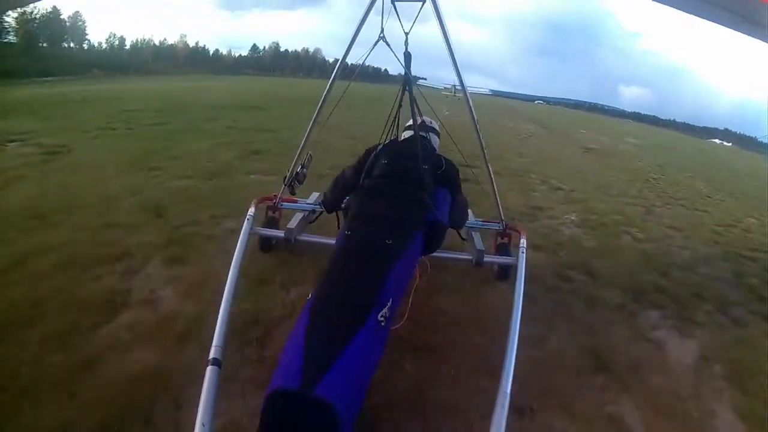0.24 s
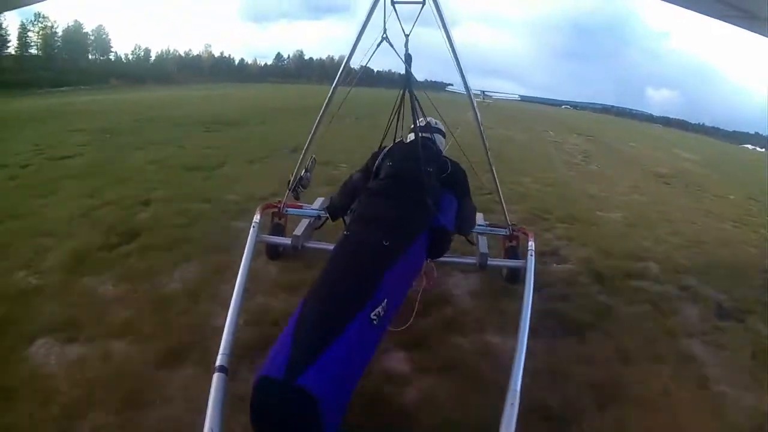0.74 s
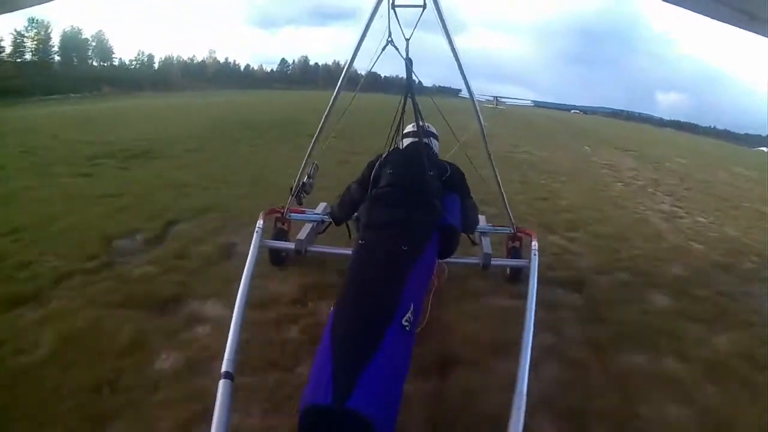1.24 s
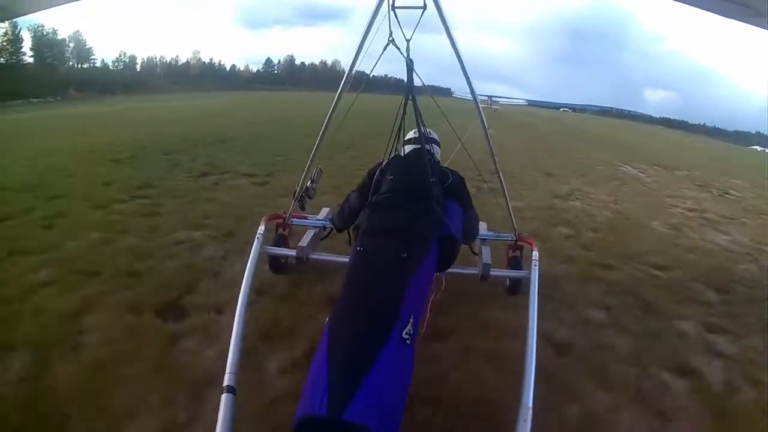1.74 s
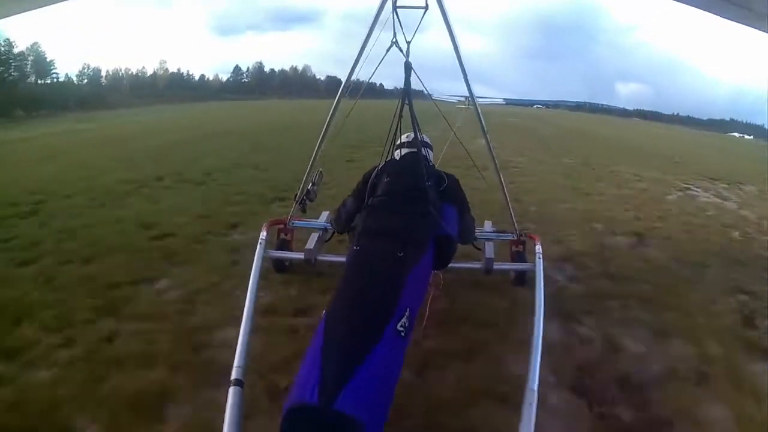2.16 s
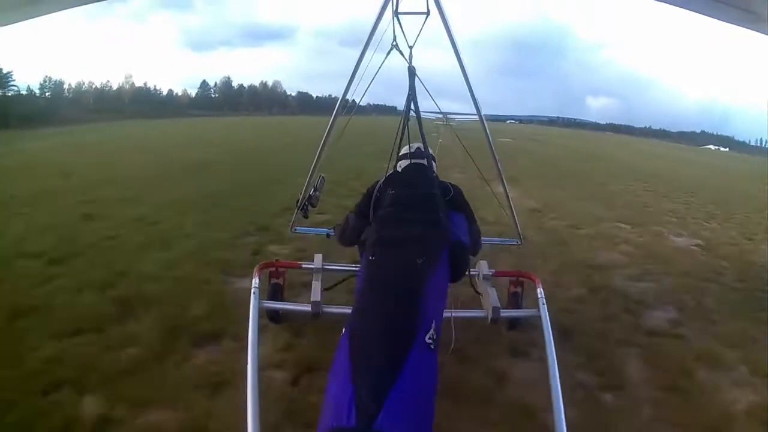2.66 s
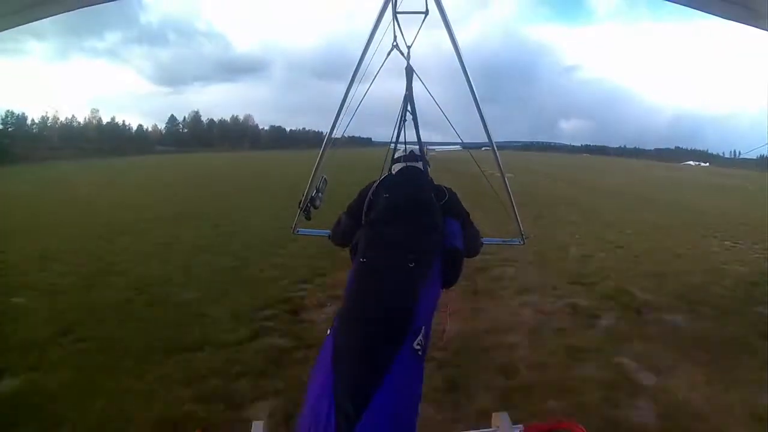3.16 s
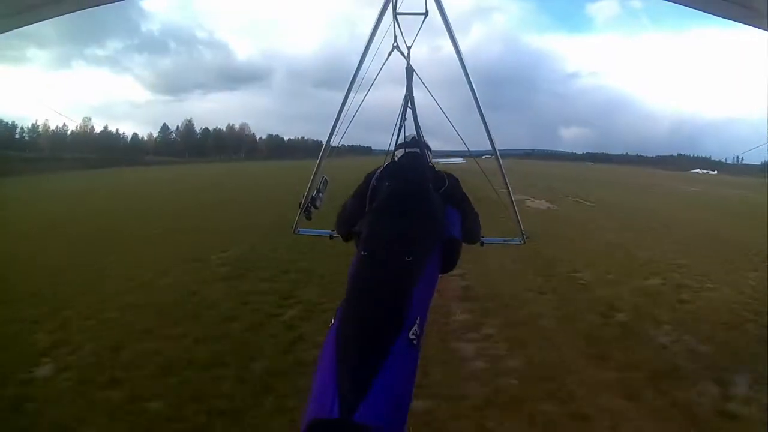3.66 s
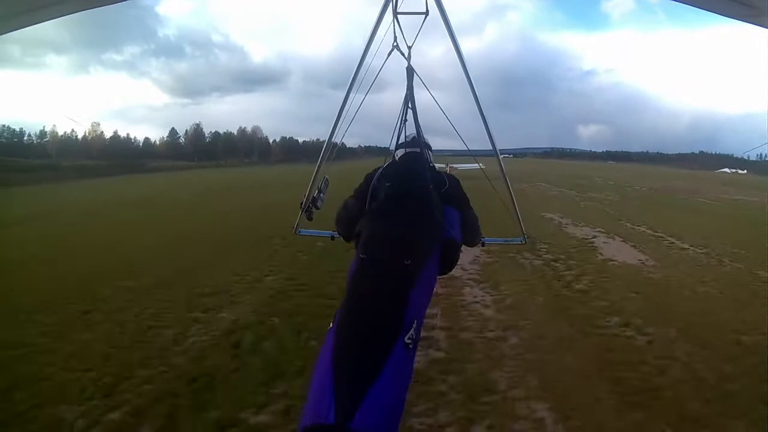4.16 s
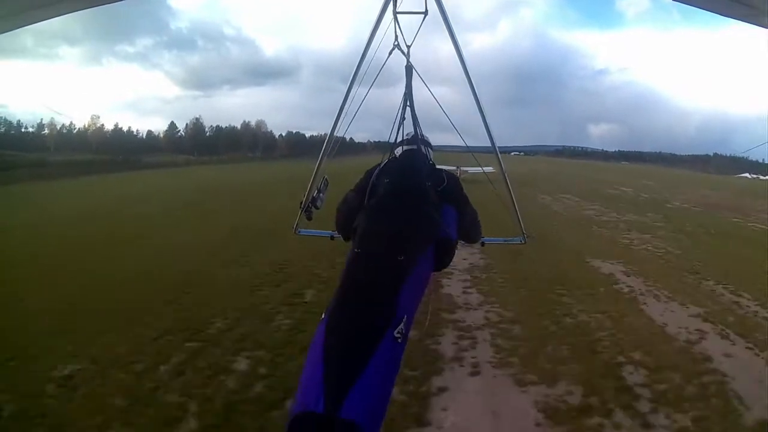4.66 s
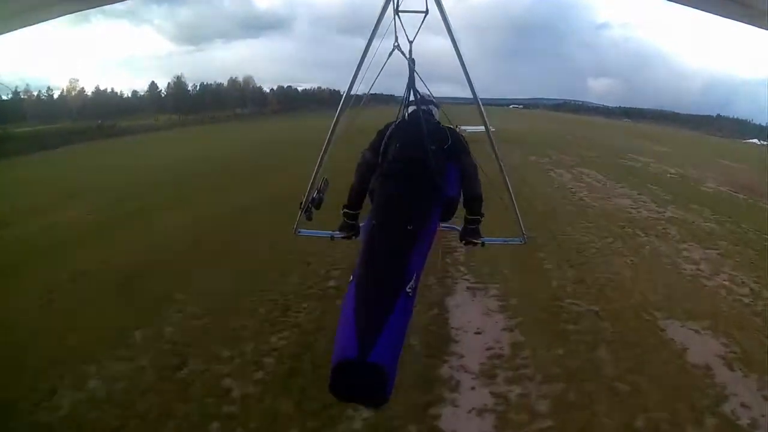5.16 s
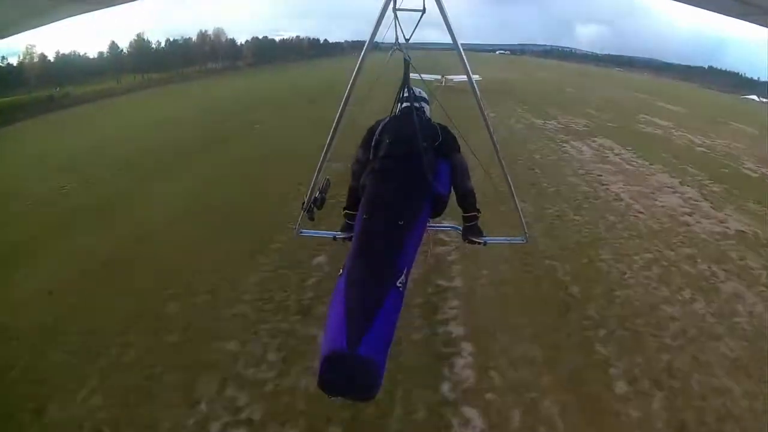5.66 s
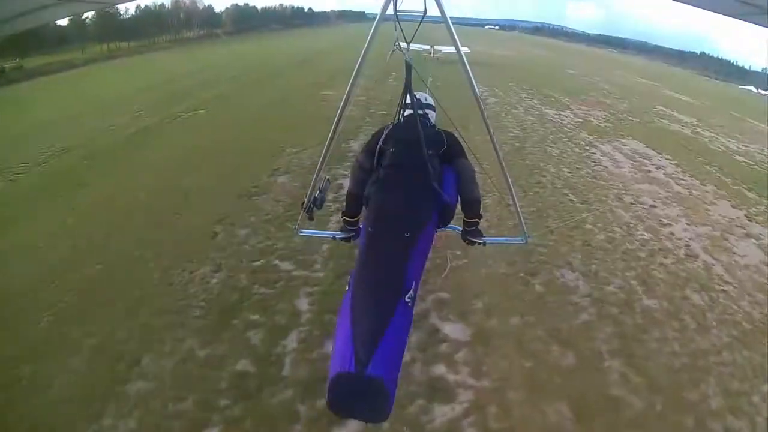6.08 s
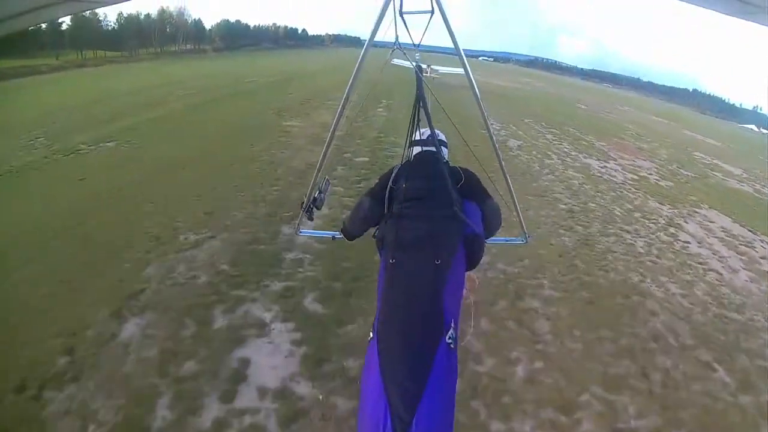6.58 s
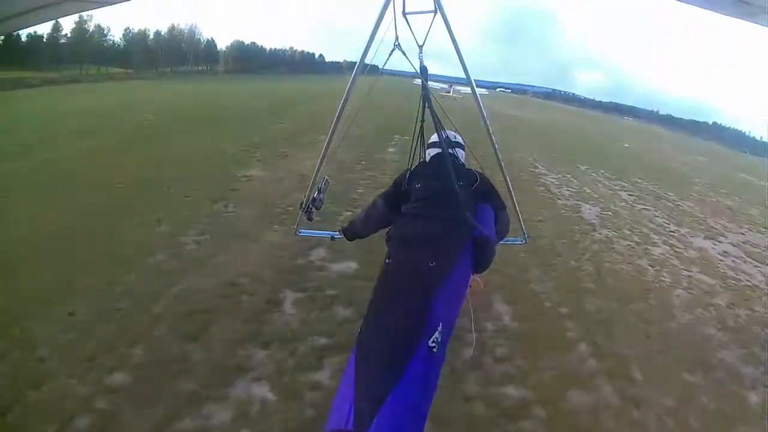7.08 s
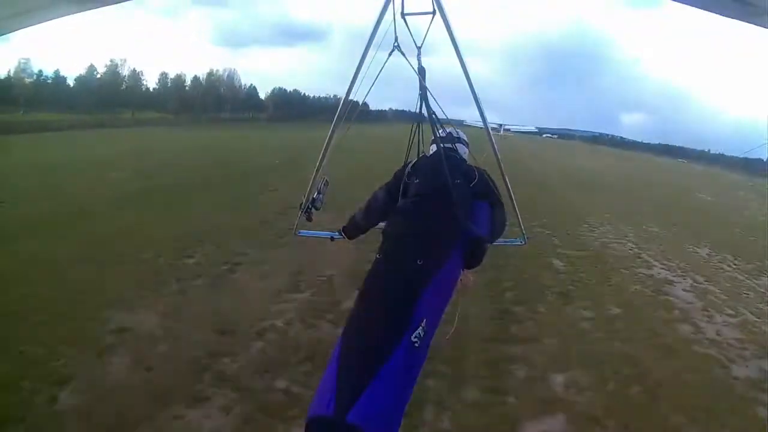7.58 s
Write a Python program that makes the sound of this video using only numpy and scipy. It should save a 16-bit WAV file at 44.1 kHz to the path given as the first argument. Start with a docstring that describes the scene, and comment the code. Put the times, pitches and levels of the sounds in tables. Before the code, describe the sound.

Left channel only, close and boxy: loose metal fittings chatter, wheels jolt over tussocks and a hollow tube sings with short, unsteady rings. The clatter is crowded and slightly distorted in the first half. After lift-off it breaks into separate small clanks and fading ticks over a muffled open-air rush, with one soft thump near five seconds, then mostly wind that dips and swells again.

```python
"""Clattering and ringing metal gives way to a rush of air with ever sparser clanks, all in the left channel.
A hang glider on a wheeled trolley is towed over rough grass, heard by a cased camera on its keel tube.
Frame and tube are banks of damped resonators driven by random contacts; fittings strike as decaying sines.
Saturation limits all the shaking; the airflow is filtered noise that bypasses it."""
import sys
import numpy as np
from scipy import signal
from scipy.fft import rfft, irfft
from scipy.io import wavfile
from scipy.ndimage import uniform_filter1d

SR = 44100
rng = np.random.default_rng(int(sys.argv[2]) if len(sys.argv) > 2 else 0)


def persist_wave(psi):
    """Save psi, clipped to +-1, as 16-bit WAV."""
    counts = np.round(np.clip(psi, -1, 1) * 32767).astype(np.int16)
    wavfile.write(sys.argv[1], SR, np.atleast_2d(counts).T)


N = 344862
TIME = np.arange(N) / SR
LIFT_OFF_S = 3.78


def from_db(db):
    """Logarithmic level: decibels to amplitude gain."""
    return 10 ** (np.asarray(db) / 20)


def rms_one(x):
    """Normalisation: scale to unit rms."""
    return x / np.sqrt(np.mean(x ** 2) + 1e-20)


def in_time(rows):
    """Linear interpolation: one curve per column, at every sample."""
    s, *columns = np.transpose(rows)
    return [np.interp(TIME, s, c) for c in columns]


def drift(rate_hz):
    """Low-passed noise: a slow random curve of spread 1, made at every 40th sample."""
    step, settle = 40, 2000   # samples; slow samples discarded
    pole = np.exp(-2 * np.pi * step * rate_hz / SR)
    noise = rng.standard_normal(N // step + settle + 2)
    slow = signal.lfilter([1], [1, -2 * pole, pole * pole], noise)[settle:]
    return np.interp(np.arange(N) / step, np.arange(len(slow)), rms_one(slow))


def colour(x, spectrum, size=4096):
    """Minimum-phase filtering: the folded cepstrum gives a causal response through a spectrum table."""
    hz, db = np.transpose(spectrum)
    grid = np.maximum(np.arange(size // 2 + 1) * SR / size, 1)
    cepstrum = irfft(np.log(from_db(np.interp(np.log(grid), np.log(hz), db))))
    cepstrum[1:size // 2] *= 2
    cepstrum[size // 2 + 1:] = 0
    response = irfft(np.exp(rfft(cepstrum)))
    return signal.fftconvolve(x, response)[:N]


def ring(force, hz, t60):
    """Damped resonance: a unit click starts a sine of height 1 that falls 60 dB in t60 seconds."""
    r = from_db(-60 / (t60 * SR))
    w = 2 * np.pi * hz / SR
    return signal.lfilter([0, np.sin(w)], [1, -2 * r * np.cos(w), r * r], force + 1e-18)


def contacts(per_s, spread_db):
    """Random point process: touches of uneven strength and either sign."""
    sizes = from_db(spread_db * np.minimum(rng.exponential(1, N), 4)) * rng.choice([-1, 1], N)
    return sizes * (rng.random(N) < per_s / SR)


def evened(x, size=2400):
    """Level control: hold the running rms near 1, keeping the fast grain."""
    power = np.maximum(uniform_filter1d(x ** 2, size), 0)
    return x / np.sqrt(power + 1e-4 * np.mean(x ** 2))


def blow(rise_s, t60):
    """Impact envelope: time axis and a smooth rise with exponential decay, peak 1."""
    t = TIME[:SR // 2]
    shape = (1 - np.exp(-(t / rise_s) ** 2)) * from_db(-60 * t / t60)
    return t, shape / shape.max()


def held(attack_s, hold_s, t60):
    """Sustained envelope: time axis and a linear rise, a hold and an exponential decay."""
    t = TIME[:SR // 2]
    return t, np.minimum(t / attack_s, 1) * from_db(-60 * np.maximum(t - hold_s, 0) / t60)


def add(out, s, sound):
    """Superposition: mix a sound in at time s."""
    at = max(round(s * SR), 0)
    out[at:at + len(sound)] += sound[:N - at]


def chatter(per_s, depth_db, t60):
    """Bouncing contact: a gain of sudden knocks at uneven gaps, each dying fast; running rms near 1."""
    strikes = np.abs(contacts(per_s, spread_db=2.0))
    knocks = signal.lfilter([1], [1, -from_db(-60 / (t60 * SR))], strikes + 1e-18)
    return evened(np.hypot(1, from_db(depth_db) * rms_one(knocks)), size=4400)


def pings(per_s, hz, scatter_hz, t60, spread_db):
    """Scattered impacts: random short strikes, each with its own pitch and strength; rms 1."""
    out = np.zeros(N)
    t, shape = blow(rise_s=.003, t60=t60)
    t, shape = t[:SR // 10], shape[:SR // 10]
    gaps = rng.uniform(.3, 1.7, 1000)   # relative to the mean gap
    draws = rng.standard_normal((1000, 2))
    for s, (pitch, size) in zip(np.cumsum(gaps) / per_s, draws):
        if s < TIME[-1]:
            tone = np.sin(2 * np.pi * (hz + scatter_hz * pitch) * t)
            add(out, s, from_db(spread_db * min(size, 2)) * shape * tone)
    return rms_one(out)


# Modes of the glider's frame. Each row: frequency in Hz, relative level in dB, t60 in seconds.
FRAME_MODES = [(93.6, -11, 1), (178.7, -11.5, 0.41), (265, -17, 0.25), (417, -12, 0.13), (505, 1, 0.25),
               (680.5, -2.5, 0.25), (768.4, -10, 0.12), (865, -1, 0.29), (941, -4, 0.017),
               (1054, -1, 0.044)]


def stirred_frame(force):
    """Modal superposition: the frame's modes under a steady random force, each weighted by its level."""
    return sum(from_db(db) * rms_one(ring(force, hz, t60)) for hz, db, t60 in FRAME_MODES)


# Course of the airflow. Each row: time in seconds, relative level in dB.
WIND_LEVEL = [(3.7, -45), (4.0, -38.5), (4.35, -38), (4.9, -42), (5.3, -46.5), (6.2, -46), (6.55, -42.5),
              (7.27, -41), (7.82, -37)]
# Rush of air as it sounds inside the case. Each row: frequency in Hz, relative level in dB.
AIR_SPECTRUM = [(40, -38.5), (170, -28), (320, -23), (460, -11), (620, -9.5), (800, -3.5), (875, -1),
                (970, -3.5), (1330, 3.5), (1570, -2.5), (1780, -14.5), (2100, -14.5), (2550, -22),
                (3100, -36), (3520, -34.5), (4400, -48.5), (5000, -62.5), (14000, -87.5)]


def airflow(start_db=-31.0, flutter_db=1.1, grain_db=1.0, hum_db=-16):
    """Turbulence noise: a fluttering rush grows up to lift-off and stirs the frame's modes."""
    ground_db = np.interp(TIME, [0, LIFT_OFF_S], [start_db, 0])
    eddies = rng.standard_normal(N) * from_db(flutter_db * drift(6.5) + grain_db * drift(200))
    rush = rms_one(colour(eddies, AIR_SPECTRUM))
    hum = stirred_frame(rng.standard_normal(N))
    hum = signal.sosfilt(signal.butter(2, [170, 800], "band", fs=SR, output="sos"), hum)
    level = from_db(ground_db + in_time(WIND_LEVEL)[0])
    return level * (rush + from_db(hum_db) * rms_one(hum))


# A wheel hits a tussock. Each row: start in seconds, level in dB, nominal pitch of the knock in Hz.
WHEEL_JOLTS = [(.292, -21.5, 725), (0.538, -19, 878), (0.582, -13.5, 933), (0.794, -17.5, 926),
               (0.933, -13.5, 942), (1.002, -15.5, 930), (1.024, -16, 939), (1.126, -11, 883),
               (1.243, -15.5, 950), (1.35, -13, 913), (1.402, -22.5, 958), (1.454, -11.5, 929),
               (1.73, -15.5, 690), (1.868, -23.5, 868), (2.322, -22, 830), (2.399, -14, 854),
               (2.67, -18.5, 870), (2.786, -17, 851), (3.46, -23, 721), (3.544, -19, 873)]
# Short, dead knocks on the frame. Each row: start in seconds, level in dB, nominal pitch in Hz.
FRAME_KNOCKS = [(2.035, -18, 1380), (2.09, -18, 920), (2.478, -10, 1150), (2.526, -20, 1000),
                (3.285, -16, 1270), (3.486, -19, 1050), (5.293, -32, 697), (5.78, -30, 660)]
# Dead knock of a wheel or a fitting. Each row: frequency in Hz, relative level in dB.
KNOCK_SPECTRUM = [(55, -16), (170, 6), (500, 3.5), (900, -5), (1300, -0.5), (2000, -8), (3000, -16.5),
                  (6000, -35.5), (14000, -46)]
JOLT_RISE_S, JOLT_T60_S, KNOCK_T60_S = 0.0024, 0.11, 0.064


def frame(rumble, jolt_db=-2.5, knock_db=3.0, rough_db=-8, waver=0.049, patter_db=-6):
    """Forced modal vibration: tussocks shake and patter on the frame, with separate pitched jolts."""
    jolts, tones = np.zeros((2, N))
    bend = np.cumsum(1 + waver * drift(120)) / SR   # the contact stiffens and slackens within a jolt
    for rows, t60, shake_db in (WHEEL_JOLTS, JOLT_T60_S, jolt_db), (FRAME_KNOCKS, KNOCK_T60_S, rough_db):
        t, shape = blow(JOLT_RISE_S, t60)
        for s, db, hz in rows:
            add(jolts, s, from_db(db + shake_db) * shape)
            clock = bend[round(s * SR):][:len(t)]
            add(tones, s, from_db(db) * shape[:len(clock)] * np.sin(2 * np.pi * hz * clock))
    force = contacts(per_s=1500, spread_db=3.0) * chatter(per_s=33, depth_db=10.5, t60=0.051)
    modes = np.zeros(N)
    for k, (hz, db, t60) in enumerate(FRAME_MODES):
        modes += (-1) ** k * from_db(db) * rms_one(ring(force, hz, t60))   # alternate polarity
    knocking = rms_one(colour(force, KNOCK_SPECTRUM))
    shake = evened(rms_one(modes) + from_db(knock_db) * knocking, size=1500)
    patter = pings(per_s=40, hz=950, scatter_hz=220, t60=.035, spread_db=4)
    return tones + shake * np.hypot(jolts, rumble) + from_db(patter_db) * patter * rumble


# Loose fittings thrown into a bout of rattling. Each row: start in seconds, hold in seconds, level in dB.
RATTLE_BOUTS = [(0.566, 0.031, -14.5), (0.618, 0.017, -10), (0.789, .02, -18.5), (0.81, 0.058, -20),
                (0.919, 0.13, -16.5), (1.082, 0.083, -15.5), (1.183, 0.037, -19.5), (1.241, 0.033, -17.5),
                (1.299, 0.024, -17.5), (1.335, 0.037, -17), (1.4, 0.019, -15.5), (1.46, 0.062, -13),
                (1.527, 0.076, -21), (1.705, 0.02, -14), (1.762, 0.017, -18), (1.936, 0.022, -11.5),
                (1.978, 0.15, -18), (2.137, 0.065, -16.5), (2.255, 0.042, -17.5), (2.398, 0.032, -16.5),
                (2.507, 0.076, -20), (2.673, 0.062, -23), (2.752, 0.049, -21.5), (2.943, 0.017, -16),
                (2.986, 0.021, -22), (3.043, 0.039, -22.5), (3.331, 0.025, -18.5), (3.386, .11, -20),
                (3.59, 0.026, -28)]
RATTLE_ATTACK_S, RATTLE_T60_S = 0.011, 0.075


def bouts():
    """Envelope superposition: the strength of the rattling, bout by bout."""
    gain = np.zeros(N)
    for s, hold_s, db in RATTLE_BOUTS:
        add(gain, s, from_db(db) * held(RATTLE_ATTACK_S, hold_s, RATTLE_T60_S)[1])
    return gain


# Ringing modes of the keel tube. Each row: frequency in Hz, relative level in dB, t60 in seconds.
TUBE_MODES = [(1592, 0, .3), (1621, -1, .3), (1680, -2, .15), (2260, -9, .09), (4540, -14, .1),
              (5505, -20, .2)]
# Clatter of metal. Each row: frequency in Hz, relative level in dB.
CLATTER_SPECTRUM = [(30, -27), (200, -1.5), (700, 1), (1200, -2), (1520, 6.5), (1900, -1), (2300, -2.5),
                    (3200, -18), (6000, -10), (14000, -33)]
CLACK_HZ = 1539.5


def fittings(rumble, tube_db=-1.0, spill_db=-13.0, loose_db=-24.5, loose_power=1.36, clack_db=-3, grit_db=-2):
    """Repeated impact excitation: loose metal chatters with the shaking and stirs the tube's modes."""
    loose = from_db(loose_db) * (rumble / rumble.max()) ** loose_power
    rattling = np.hypot(bouts(), loose)
    bounce = chatter(per_s=50, depth_db=10.0, t60=.035)
    force = contacts(per_s=200, spread_db=3.0) * bounce
    tube = evened(sum(from_db(db) * ring(force, hz, t60) for hz, db, t60 in TUBE_MODES), size=1500)
    scratches = contacts(per_s=2200, spread_db=0.0) * bounce
    grit = evened(colour(scratches, CLATTER_SPECTRUM), size=1500)
    clacks = pings(per_s=70, hz=CLACK_HZ, scatter_hz=45, t60=.025, spread_db=3)
    tube_level = np.hypot(from_db(spill_db) * rattling, from_db(tube_db) * rumble)
    return tube_level * tube + rattling * (from_db(grit_db) * grit + from_db(clack_db) * clacks)


# Response of the camera to shaking. Each row: frequency in Hz, relative level in dB.
CASE_RESPONSE = [(30, -18), (500, -6), (920, 1.5), (1250, -3.5), (1650, -6.5), (2600, -7.5), (3100, -15),
                 (4650, -31), (5000, -48.5), (5700, -40.5), (7000, -50.5), (8300, -35.5), (11500, -32),
                 (14000, -54.5)]
OVERLOAD_DB, KNEE = -17.5, 40   # limit before the case filter; a larger knee exponent bends more sharply


def camera(shaking):
    """Amplitude saturation: shaking overloads the microphone, adding a thin buzz; the case then dulls it."""
    drive = np.abs(shaking) / from_db(OVERLOAD_DB)
    return colour(shaking / (1 + drive ** KNEE) ** (1 / KNEE), CASE_RESPONSE)


# The keel tube sings on in one of its modes.
# Each row: start in seconds, hold in seconds, level in dB, nominal pitch in Hz.
TUBE_RINGS = [(0.147, 0.012, -29, 1646), (0.269, 0.007, -19, 1700), (0.306, 0.14, -29, 1619),
              (0.418, 0.038, -17.5, 1600), (0.714, 0.012, -20.5, 1627), (.933, 0.018, -19.5, 1524),
              (0.964, 0.023, -13, 1675), (1.204, 0.024, -24.5, 1630), (1.301, 0.017, -36, 1630),
              (1.467, 0.09, -26.5, 1594), (1.552, 0.11, -22, 1642), (2.105, 0.019, -16.5, 1677),
              (2.157, 0.12, -20, 1618), (2.547, 0.034, -20, 1673), (2.741, 0.008, -21.5, 1579),
              (2.927, 0.19, -21.5, 1597), (3.219, 0.017, -30.5, 1700), (3.34, 0.0097, -11.5, 1600),
              (3.4, 0.046, -15, 1590), (3.612, 0.023, -27.5, 1580), (3.796, 0.067, -25, 1577),
              (4.955, 0.021, -26, 1574), (6.172, 0.017, -23, 1595)]
RING_ATTACK_S, RING_T60_S = 0.0067, 0.29


def singing(waver=0.0026, flicker_db=4.0, partner_hz=72, partner_db=-11):
    """Beating of close modes: one unsteady tube mode rings on against a weaker one just above it."""
    out = np.zeros(N)
    clock = np.cumsum(1 + waver * drift(14)) / SR
    for s, hold_s, db, hz in TUBE_RINGS:
        t, shape = held(RING_ATTACK_S, hold_s, RING_T60_S)
        at = round(s * SR)
        turn = 2 * np.pi * (clock[at:][:len(t)] - clock[at])
        tone = np.sin(hz * turn) + from_db(partner_db) * np.sin((hz + partner_hz) * turn)
        add(out, s, from_db(db) * shape * tone)
    return out * from_db(flicker_db * drift(60))


def shimmer(level_db=-33, follows=.6, t60=.33, top_db=4.0):
    """Higher-mode excitation: each held tube ring also flares the two highest modes, which last longer."""
    out = np.zeros(N)
    for s, hold_s, db, _ in TUBE_RINGS:
        t, shape = held(RING_ATTACK_S, hold_s, t60)
        pitches = [mode[0] + 20 * rng.standard_normal() for mode in TUBE_MODES[-2:]]   # scattered by 20 Hz
        lower, upper = (np.sin(2 * np.pi * hz * t) for hz in pitches)
        add(out, s, from_db(level_db + follows * db) * shape * (lower + from_db(top_db) * upper))
    return out


# A metal fitting strikes the tube. Each row: start in seconds, tick level in dB, clack level in dB.
FITTING_CLANKS = [(0.152, -16, -14.5), (0.222, -31, -23), (.271, -5, -11), (0.333, -28, -10.5),
                  (0.361, -33, -17), (0.406, -33.5, -6.5), (.538, -43, -15.5), (0.713, -27, 0),
                  (2.843, -16, -8.5), (2.897, 4, -15.5), (2.954, -8, -16.5), (3.211, -29, -7),
                  (3.329, -40, -8), (3.792, -16.5, -16.5), (3.892, -28, -19.5), (3.97, -43, -14),
                  (4.038, -46, -8.5), (4.167, -45, -22), (4.207, -33, -23), (4.256, -21, -28.5),
                  (4.352, -25, -22.5), (4.402, -32, -14), (4.621, -39, -17.5), (4.727, -30, -14.5),
                  (4.79, -42.5, -23.5), (4.823, -24, -15.5), (4.946, -5, -13), (5.041, -23.5, -17.5),
                  (5.058, -20, -23), (5.396, -41, -23), (5.504, -40, -17), (5.576, -11.5, -17.5),
                  (5.696, -19, -12), (5.835, -49, -23), (5.924, -12, -8), (6.067, -18.5, -20.5),
                  (6.158, -20, -9.5), (6.398, -27, -19.5), (7.626, -30, -28)]
CLACK_SCATTER_HZ, TICK_HZ, TICK_SCATTER_HZ = 35, 2240, 112


def clanks(scrape_db=-10.5, thud_db=-25, delay_s=0.0015, ring_db=-21, body_db=-21, body_hz=880, body_t60=0.11):
    """Two-stage impact: a tick at first touch, a clack as the fitting seats, then frame and tube ring."""
    out, scrape, thud, strikes = np.zeros((4, N))
    t, tick = blow(rise_s=0.00014, t60=0.0072)
    t, clack = blow(rise_s=0.0026, t60=0.022)
    draws = rng.standard_normal((len(FITTING_CLANKS), 2))
    for (s, tick_db, db), (high, low) in zip(FITTING_CLANKS, draws):
        tick_tone = np.sin(2 * np.pi * (TICK_HZ + TICK_SCATTER_HZ * high) * t)
        clack_tone = np.sin(2 * np.pi * (CLACK_HZ + CLACK_SCATTER_HZ * low) * t)
        add(out, s, from_db(tick_db) * tick * tick_tone)
        add(out, s + delay_s, from_db(db) * clack * clack_tone)
        add(scrape, s, from_db(db + scrape_db) * blow(rise_s=0.0019, t60=0.048)[1])
        add(thud, s + delay_s, from_db(db + thud_db) * blow(rise_s=0.011, t60=0.05)[1])
        add(strikes, s + delay_s, from_db([db]))
    noise = rng.standard_normal((2, N))
    out += scrape * rms_one(colour(noise[0], CLATTER_SPECTRUM))
    out += thud * rms_one(stirred_frame(noise[1]))
    out += from_db(body_db) * ring(strikes, body_hz, body_t60)
    for hz, db, t60 in TUBE_MODES:
        uneven = strikes * rng.standard_normal(N)   # each strike wakes each mode differently
        out += from_db(db + ring_db) * ring(uneven, hz, t60)
    return out


# Brief dips in the level. Each entry: centre in seconds.
LEVEL_DIPS = [1.75, 1.848, 1.929, 2.453, 2.464, 2.489, 2.505, 2.888, 3.253, 3.273, 3.281, 3.295, 3.308]
DROPOUT_S = 0.006


def dropouts(depth_db=-40.0, size=60):
    """Amplitude gating: a smoothed gain that falls for a few milliseconds at a time."""
    gain = np.ones(N)
    for s in LEVEL_DIPS:
        gain[np.abs(TIME - s) < DROPOUT_S / 2] = from_db(depth_db)
    return uniform_filter1d(uniform_filter1d(gain, size), size)


def rigging(tick_db=-42.0, settle_s=1.37):
    """Exponential settling: light ticks of wires and clips die away once the glider flies."""
    ticks = evened(colour(contacts(per_s=70, spread_db=4.0), CLATTER_SPECTRUM), size=6000)
    settle = (TIME > LIFT_OFF_S) * np.exp((LIFT_OFF_S - TIME) / settle_s)
    return settle * from_db(tick_db) * ticks


# Soft, heavy blows on the airborne frame.
# Each row: start in seconds, blow level in dB, boom level in dB, boom pitch in Hz.
SOFT_THUMPS = [(5.043, -23, -22, 234), (6.251, -36, -33.5, 188), (7.626, -35, -34.5, 431)]


def thumps(soft_hz=720, scuff_db=10.0, scuff_t60=0.11, low_hz=450, boom_t60=0.17):
    """Padded impact: a low-passed blow wakes the frame's modes under a rough scuff, beside a low boom."""
    force, scuff, boom = np.zeros((3, N))
    for s, db, boom_db, hz in SOFT_THUMPS:
        add(force, s, from_db([db]))
        add(scuff, s, from_db(db + scuff_db) * blow(rise_s=0.0011, t60=scuff_t60)[1])
        t, shape = blow(JOLT_RISE_S, boom_t60)
        add(boom, s, from_db(boom_db) * shape * np.sin(2 * np.pi * hz * t))
    modes = np.zeros(N)
    for k, (hz, db, t60) in enumerate(FRAME_MODES):
        modes += (-1) ** k * from_db(db) * ring(force, hz, t60)
    modes = signal.sosfilt(signal.butter(2, 140, "high", fs=SR, output="sos"), modes)
    grain = colour(rng.standard_normal(N), KNOCK_SPECTRUM)
    grain = signal.sosfilt(signal.butter(2, low_hz, "high", fs=SR, output="sos"), grain)
    padding = signal.butter(2, soft_hz, fs=SR, output="sos")
    return boom + signal.sosfilt(padding, modes + scuff * rms_one(grain))


# How hard the rolling wheels shake the frame. Each row: time in seconds, level in dB.
WHEEL_SHAKE = [(0, -46.5), (.13, -51), (.18, -39.5), (.52, -37.5), (.8, -33), (.9, -38.5), (1.0, -35),
               (1.68, -32.5), (2.0, -30), (2.31, -28.5), (2.365, -35), (2.42, -29.5), (2.65, -30),
               (2.88, -34), (3.31, -35), (3.62, -30.5), (3.75, -48)]


def scene():
    """Two transmission paths: shaking comes through the keel tube, wind through the air; left channel only."""
    rolling = np.interp(TIME, [LIFT_OFF_S, LIFT_OFF_S + 0.25], [1, 0])
    rumble = rolling * from_db(in_time(WHEEL_SHAKE)[0])
    shaking = frame(rumble) + fittings(rumble) + singing() + shimmer() + clanks() + rigging() + thumps()
    left = 2 * (camera(shaking) + airflow()) * dropouts()
    return np.array([left, np.zeros(N)])


def record(dry):
    """Band limiting: a steep low-pass holds everything above 15 kHz at least 60 dB down."""
    return signal.sosfilt(signal.cheby2(12, 60, 15000, fs=SR, output="sos"), dry)


dry = scene()
out = record(dry)
persist_wave(out)
```